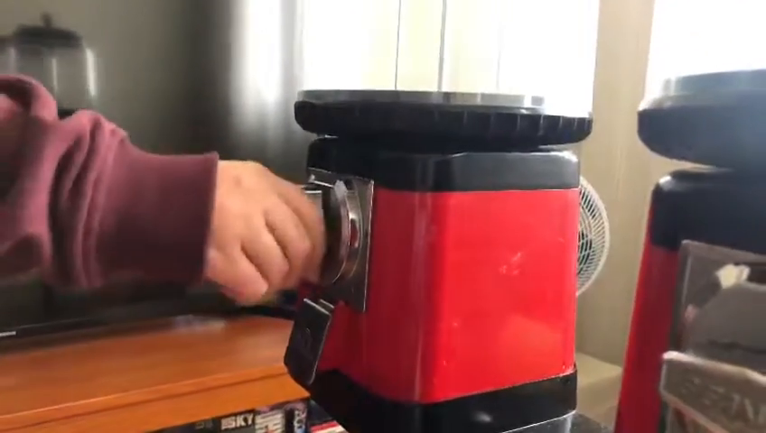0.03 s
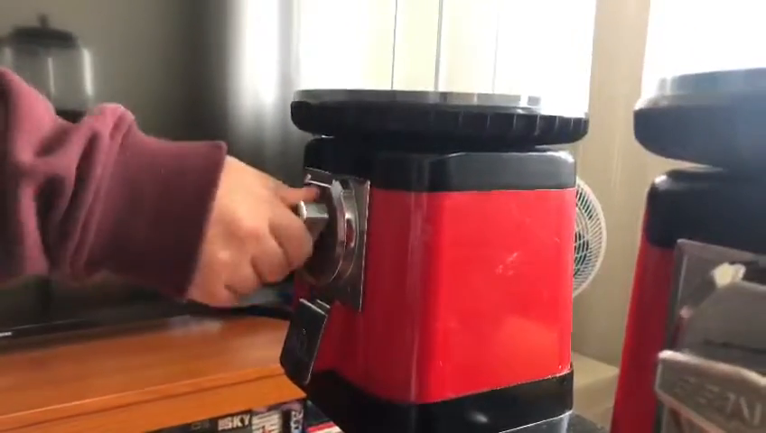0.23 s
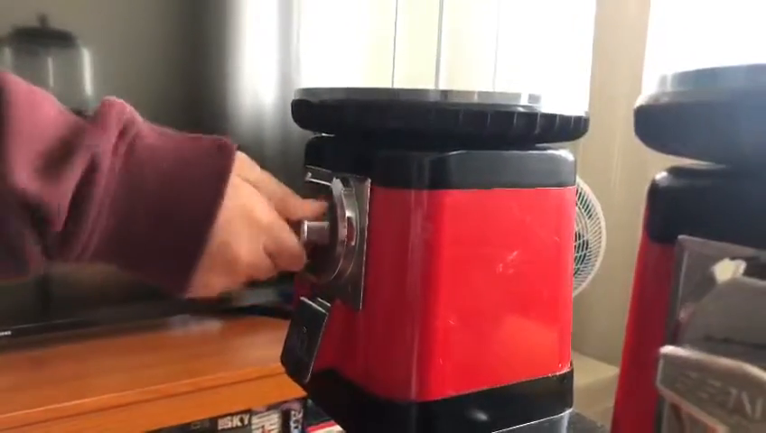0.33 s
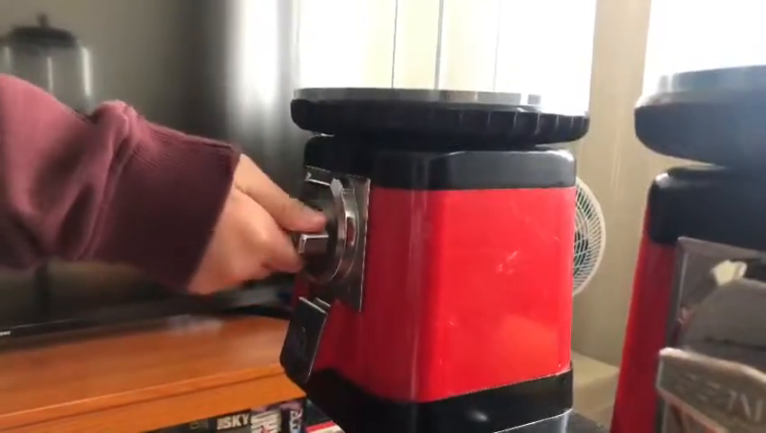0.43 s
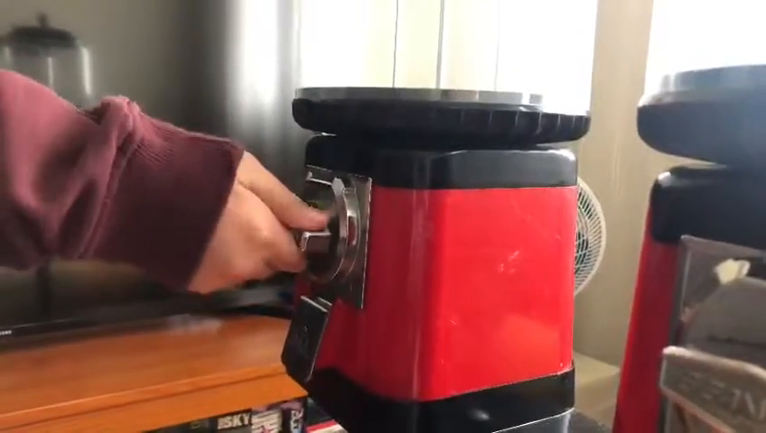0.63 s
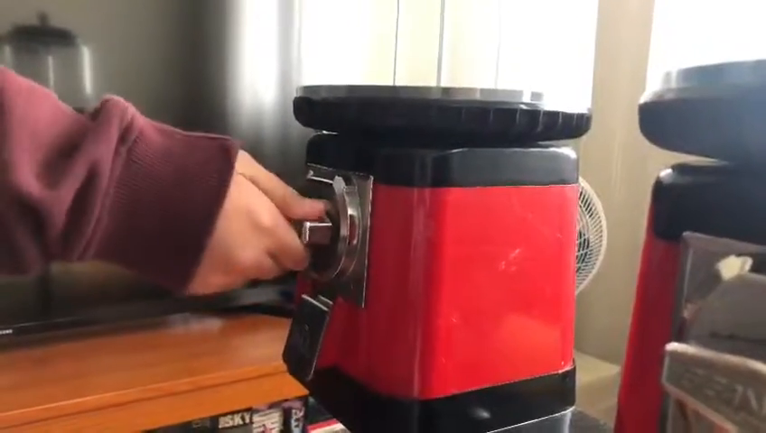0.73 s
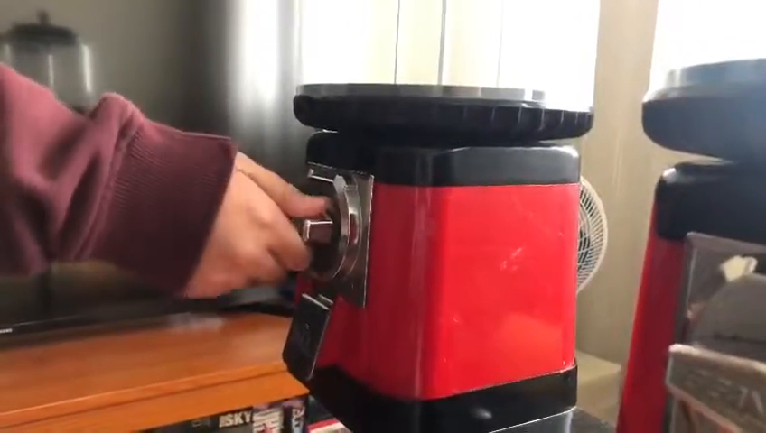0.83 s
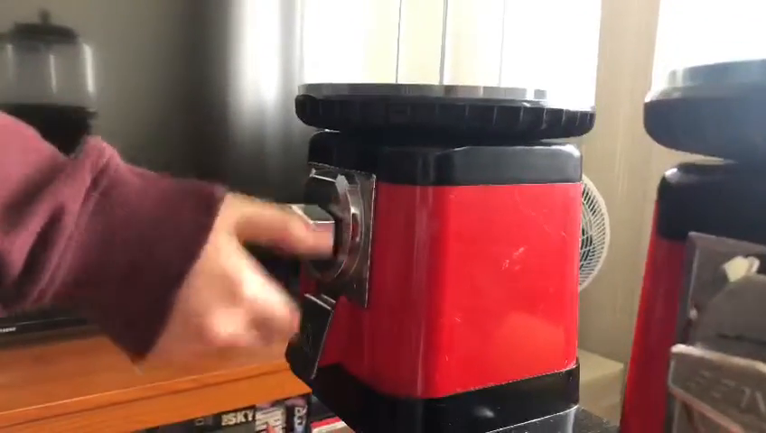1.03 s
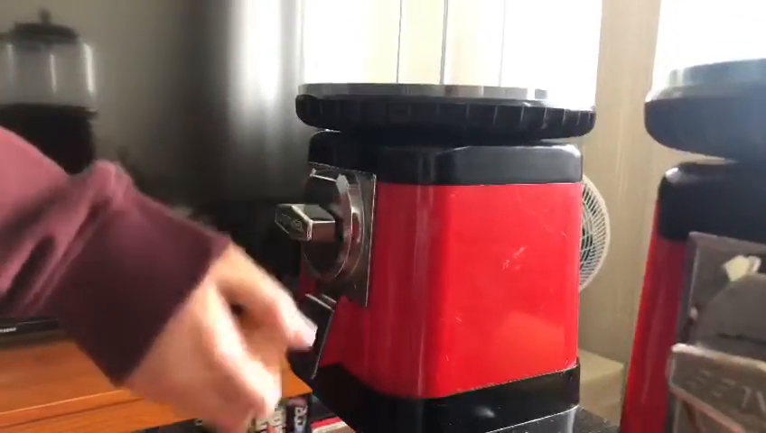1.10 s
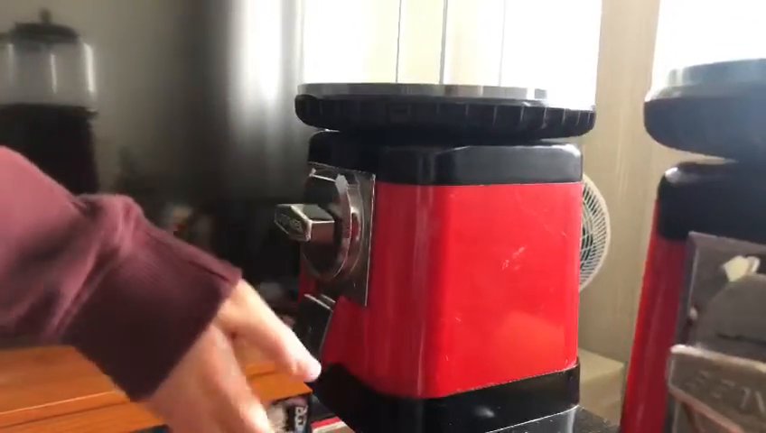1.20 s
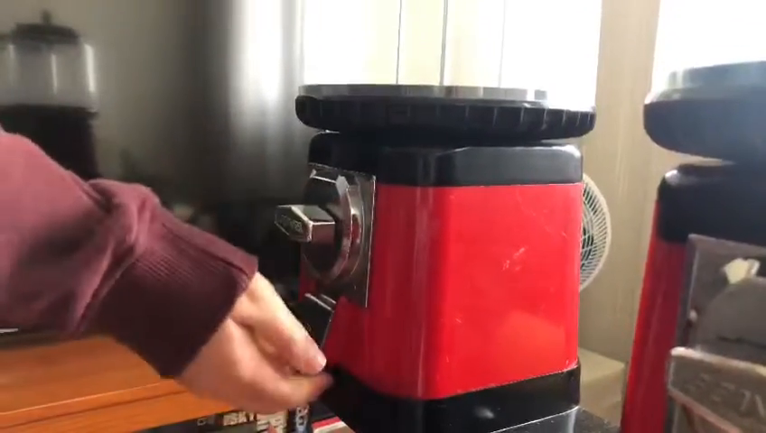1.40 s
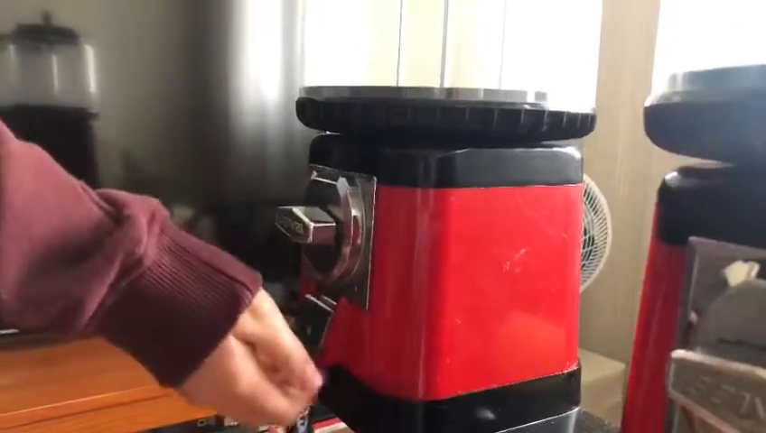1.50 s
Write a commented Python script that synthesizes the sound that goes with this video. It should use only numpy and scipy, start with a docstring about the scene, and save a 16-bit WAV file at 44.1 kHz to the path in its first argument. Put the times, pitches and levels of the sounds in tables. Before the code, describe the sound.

Metal ratchet clicks from a gumball machine, followed by a ball knocking down the chute.

```python
"""The metal knob of a tabletop gumball machine is turned in a small living room.
Over low room noise a sleeve moves; the gear grinds and a pawl snaps over six teeth (0.2-0.6 s).
Meanwhile the balls shift and one drops into the chute. From 0.7 s it bounces to rest against
the ringing metal flap, knocking on the hollow housing. The flap falls shut with a tink at 1.5 s."""
import sys
import numpy as np
from scipy import signal
from scipy.fft import rfft, irfft, next_fast_len
from scipy.io import wavfile

SR = 44100
rng = np.random.default_rng(int(sys.argv[2]) if len(sys.argv) > 2 else 0)


def to_wav(sig):
    """Store sig (one row per channel, or 1-D mono) as 16-bit WAV at the path in sys.argv[1].

    Samples outside -1..1 are clipped; the rate is SR.
    """
    pcm = np.clip(np.atleast_2d(sig), -1, 1) * 32767
    pcm = np.round(pcm).astype(np.int16)
    wavfile.write(sys.argv[1], SR, pcm.T)  # frames by channels


N = 68355
T = np.arange(N) / SR
RING_T = T[:N // 2]

# ball on the housing: (time [s], level [dB], contact cutoff [Hz], flap [dB], thud [dB], clatter [dB])
KNOCKS = [(0.7006, -16.5, 9400, -26.5, -32, -29), (0.7584, -26.5, 4880, -50, -49, -35.5),
          (0.802, -40.5, 3940, -59, -44, -49), (0.9604, -22, 4600, -42, -37.5, -32.5),
          (0.986, -37.5, 7000, -58, -50.5, -39), (1.2137, -30.5, 3500, -66.5, -45.5, -38.5),
          (1.3844, -40, 4000, -64.5, -47, -45.5), (1.477, -48.5, 3000, -63, -50.5, -42)]
# grit of a hard contact: (frequency [Hz], density [dB])
SNAP_SPECTRUM = [(1500, -7.5), (4000, -1), (6200, 5.5), (8000, 2.5), (10000, 2), (12000, -18)]
# loose housing: (frequency [Hz], density [dB])
CLATTER_SPECTRUM = [(120, -19.5), (280, -4.5), (600, -2), (900, 0), (1700, -4), (3400, -5), (4500, -11),
                    (7000, -9), (12000, -21.5)]
CLATTER_T60_S = 0.093
# hollow of the body: (frequency [Hz], level [dB], t60 [s])
HOLLOW_MODES = [(243.3, -5, .1), (288.6, 1, 0.15), (346.8, -6, 0.73)]


def from_db(db):
    """Decibels to gain."""
    return 10 ** (np.asarray(db) / 20)


def at_hz(table, hz, column=1):
    """Interpolate a column over log frequency."""
    table = np.array(table)
    return np.interp(np.log(hz + 1e-9), np.log(table[:, 0]), table[:, column])


def coloured(x, spectrum):
    """Shape a steady signal's spectrum; rms 1."""
    size = next_fast_len(len(x))
    gain = from_db(at_hz(spectrum, np.fft.rfftfreq(size, 1 / SR)))
    y = irfft(rfft(x, size) * gain, size)[:len(x)]
    return y / np.std(y)


def blow(x, span_s=0.01):
    """Scale to the energy of rms 1 over span_s."""
    return x * np.sqrt(span_s * SR / np.sum(x ** 2))


def decay(t, t60_s):
    """Fall 60 dB per t60_s."""
    return np.exp(-np.minimum(np.log(1000) * t / t60_s, 50))


def ring(modes, spread_db=0.84):
    """Struck modes of alternating sign; levels vary per blow."""
    out = 0
    for k, (hz, db, t60_s) in enumerate(modes):
        gain = (-1) ** k * from_db(db + spread_db * rng.normal())
        out += gain * decay(RING_T, t60_s) * np.sin(2 * np.pi * hz * RING_T)
    return blow(out)


def burst(spectrum, t60_s):
    """Dense modes as decaying noise."""
    return blow(coloured(rng.standard_normal(len(RING_T)), spectrum) * decay(RING_T, t60_s))


def grains(spectrum, per_s, spread_db=2):
    """Steady stream of tiny, uneven contacts."""
    sizes = from_db(spread_db * np.minimum(rng.exponential(1, N), 4))
    signs = rng.choice([-1, 1], N)
    hits = rng.random(N) < per_s / SR
    return coloured(sizes * signs * hits, spectrum)


def envelope(curve):
    """Gain from (time [s], level [dB]) points."""
    return from_db(np.interp(T, *np.transpose(curve)))


def add(out, start_s, x):
    """Mix x in at start_s."""
    i = int(start_s * SR)
    out[i:i + len(x)] += x[:N - i]


def room_noise():
    """Steady low rumble."""
    # (frequency [Hz], density [dB])
    spectrum = [(20, -21), (45, -8.5), (80, 0.5), (120, -1.5), (200, -3), (350, -6), (600, -18.5),
                (1500, -20.5), (4000, -28), (8000, -38), (12000, -45)]
    return from_db(-53) * coloured(rng.standard_normal(N), spectrum)


def reverb(x, delay_s=0.0035, build_s=0.0033):
    """Diffuse room tail in 16 bands, each with its own decay."""
    # (frequency [Hz], level [dB], t60 [s])
    bands = [(117, 10, 0.45), (330, -2, 0.5), (695, -11.5, 0.17), (1400, -7.5, 0.42), (3490, -11.5, 0.38),
             (6900, -16, 0.46), (12000, -13.5, .27)]
    t = np.maximum(RING_T - delay_s, 0)
    white = rfft(rng.standard_normal(len(t)))
    hz = np.fft.rfftfreq(len(t), 1 / SR)
    edges_hz = np.geomspace(60, 15000, 17)
    tail = 0
    for low, high in zip(edges_hz, edges_hz[1:]):
        centre_hz = np.sqrt(low * high)
        noise = irfft(white * (hz >= low) * (hz < high), len(t))
        shape = decay(t, at_hz(bands, centre_hz, column=2)) * (1 - np.exp(-t / build_s))
        tail += from_db(at_hz(bands, centre_hz)) * noise * shape / np.linalg.norm(shape)
    return signal.fftconvolve(x, tail)[:N]


def sleeve():
    """Sleeve and hand move: dull swells of noise."""
    # (time [s], level [dB])
    motion = [(0.0, -64), (0.17, -58.5), (0.8, -60), (0.9, -50.5), (0.95, -62), (1.02, -46), (1.1, -67),
              (1.17, -47.5), (1.28, -57), (1.36, -59.5), (1.45, -50.5), (1.55, -48)]
    # (frequency [Hz], density [dB])
    spectrum = [(30, -15.5), (85, 13), (200, -8), (400, 3), (1200, 0), (3000, -17), (10000, -69.5)]
    return envelope(motion) * coloured(rng.standard_normal(N), spectrum)


def scrapes_and_bumps():
    """Metal scrapes on plastic, and from 1.12 s the ball rolls on the chute; the hand bumps the knob softly."""
    # (time [s], level [dB], t60 [s])
    scrapes = [(0.208, -39.5, 0.082), (0.2159, -37.5, 0.032), (0.447, -21, .06), (1.1242, -38.5, 0.068),
               (1.129, -37.5, 0.22), (1.17, -47, 0.26)]
    # (time [s], level [dB])
    bumps = [(0.193, -42), (0.501, -37), (0.886, -43.5), (1.151, -46.5)]
    # both: (frequency [Hz], density [dB])
    scrape_spectrum = [(300, -7.5), (700, -3), (1400, 5), (2400, -3.5), (3600, 5), (4400, -4.5),
                       (5500, -10.5), (8000, -13.5), (12000, -26.5)]
    bump_spectrum = [(60, -21), (200, -3), (420, 3), (600, -5), (1100, -8), (2500, -21.5), (8000, -44.5)]
    out = np.zeros(N)
    for s, db, t60_s in scrapes:
        add(out, s, from_db(db) * burst(scrape_spectrum, t60_s))
    for s, db in bumps:
        add(out, s, from_db(db) * burst(bump_spectrum, t60_s=0.12))
    return out


def gear():
    """The turning wheel rubs: a grainy grind."""
    # (time [s], level [dB])
    rubbing = [(0.17, -69.5), (0.203, -58.5), (0.216, -41.5), (0.235, -42), (0.3, -52), (0.35, -36),
               (0.42, -41.5), (0.5, -30), (0.56, -40.5), (0.66, -54.5), (0.73, -41.5), (0.81, -38.5),
               (0.87, -61)]
    # (frequency [Hz], density [dB])
    spectrum = [(100, -24), (300, -1.5), (550, 0), (1000, 0), (2000, -6.5), (3600, -8.5), (5000, -17),
                (12000, -35.5)]
    return envelope(rubbing) * grains(spectrum, per_s=3000)


def rattle(start_s=0.461, hold_s=0.023, t60_s=0.32):
    """The balls above the wheel shift once."""
    # (frequency [Hz], density [dB])
    spectrum = [(1000, -8), (2500, -16), (4500, -6), (6000, 5.5), (8000, 2), (10000, -1.5), (12000, -10.5)]
    shape = (T > start_s) * decay(np.maximum(T - start_s - hold_s, 0), t60_s)
    return from_db(-26) * shape * grains(spectrum, per_s=5000)


def flap(shut_s=1.4845, shut_db=-37):
    """The metal flap rings thinly at each knock, then falls shut."""
    # flap alone, flap on its frame: (frequency [Hz], level [dB], t60 [s])
    flap_modes = [(3545, -4, 0.36), (6368, -11, 0.3), (6486, -3, 0.3), (8140, -0.5, 0.2), (8100, -4, .1)]
    shut_modes = [(387, -6.5, 0.46), (642, 0.5, 0.14), (800, -3.5, 0.14), (1060, 3, 0.12),
                  (1330, -5, 0.062), (1568, -0.5, .08), (3321, -4.5, 0.093), (6304, -12.5, 0.067),
                  (8140, -6.5, 0.063), (10490, -13, 0.081)]
    out = np.zeros(N)
    for s, _, _, flap_db, _, _ in KNOCKS:
        add(out, s, from_db(flap_db) * ring(flap_modes))
    add(out, shut_s, from_db(shut_db) * ring(shut_modes))
    return out


def ball():
    """A ball lands in the chute and bounces on the housing; softer contacts are duller."""
    # landings: (time [s], level [dB])
    drops = [(0.484, -33.5), (0.496, -34), (0.5187, -30), (0.5858, -20.5)]
    # both: (frequency [Hz], level [dB], t60 [s])
    chute_modes = [(585, -15, 0.13), (788, -14, .05), (946, 0.5, 0.04), (1010, -0.5, 0.084),
                   (1330, -2.5, 0.063), (1462, -9, 0.036), (1834, -8, 0.063), (2267, 1.5, 0.018),
                   (3570, -18.5, 0.2), (4370, 0.5, 0.014)]
    housing_modes = [(855, -6.5, 0.075), (1044, -4.5, 0.057), (1315, 1, 0.033), (1427, 2, 0.031),
                     (1549, -5.5, 0.035), (1856, -14, 0.09), (2147, -2.5, 0.047), (2500, -5, 0.0089),
                     (2770, -6.5, 0.029), (3216, -1, 0.027), (4106, -4.5, 0.048), (4710, -4, 0.034),
                     (4970, 1, 0.017), (6334, -4, 0.021)]
    # dense upper housing modes: (frequency [Hz], density [dB])
    dense_spectrum = [(250, -31), (600, -6.5), (1300, 3.5), (3000, -0.5), (5000, 1), (7500, -9.5),
                      (12000, -8.5)]
    out = np.zeros(N)
    for s, db in drops:
        add(out, s, from_db(db) * ring(chute_modes))
    for s, db, contact_hz, _, thud_db, clatter_db in KNOCKS:
        body = ring(housing_modes) + from_db(0.5) * burst(dense_spectrum, t60_s=0.042)
        body = blow(signal.lfilter(*signal.butter(1, contact_hz, fs=SR), body))
        crack = from_db(-15) * burst(SNAP_SPECTRUM, t60_s=0.0027)
        thud = from_db(thud_db) * ring(HOLLOW_MODES)
        clatter = from_db(clatter_db) * burst(CLATTER_SPECTRUM, CLATTER_T60_S)
        add(out, s, from_db(db) * (body + crack) + thud + clatter)
    return out


def ratchet():
    """The pawl snaps over each tooth; the housing clatters and thuds."""
    # (time [s], snap [dB], clatter [dB], thud [dB])
    teeth = [(0.2466, -19, -21.5, -38), (0.3238, -19.5, -21.5, -37.5), (0.3701, -18, -22, -40),
             (0.4428, -19, -25.5, -29), (0.4689, -18, -43, -39.5), (0.5834, -26.5, -25.5, -37)]
    # (frequency [Hz], level [dB], t60 [s])
    pawl_modes = [(2640, -14.5, 0.034), (3410, -9.5, 0.0081), (5970, -1, 0.01), (6550, -1, 0.0076),
                  (7620, -1, 0.0053), (8700, -3, 0.0045), (9880, -11.5, 0.0051), (11480, -11, 0.013)]
    out = np.zeros(N)
    for s, snap_db, clatter_db, thud_db in teeth:
        snap = blow(ring(pawl_modes) + from_db(-2) * burst(SNAP_SPECTRUM, t60_s=0.0094))
        clatter = from_db(clatter_db) * burst(CLATTER_SPECTRUM, CLATTER_T60_S)
        thud = from_db(thud_db) * ring(HOLLOW_MODES)
        add(out, s, from_db(snap_db) * snap + clatter + thud)
    return out


def scene():
    """Machine parts, each by its own room path, plus sleeve and room noise; mono."""
    # (signal, reverb send [dB])
    parts = [(ratchet(), -0.5), (rattle() + gear() + scrapes_and_bumps(), -1.3), (ball(), 0), (flap(), -7.5)]
    machine = sum(x + from_db(send_db) * reverb(x) for x, send_db in parts)
    bass_cut_hz = 140   # the machine's sound holds little below this
    machine = signal.sosfilt(signal.butter(2, bass_cut_hz, "high", fs=SR, output="sos"), machine)
    return (machine + sleeve() + room_noise())[None]


def record(dry):
    """Soft clip, then steep low-pass."""
    cutoff_hz = 12100
    return signal.sosfilt(signal.ellip(10, .3, 75, cutoff_hz, fs=SR, output="sos"), np.tanh(dry))


dry = scene()
out = record(dry)
to_wav(out)
```